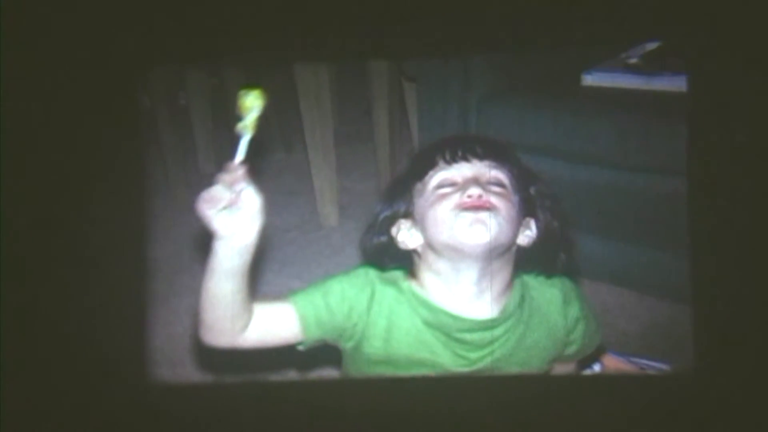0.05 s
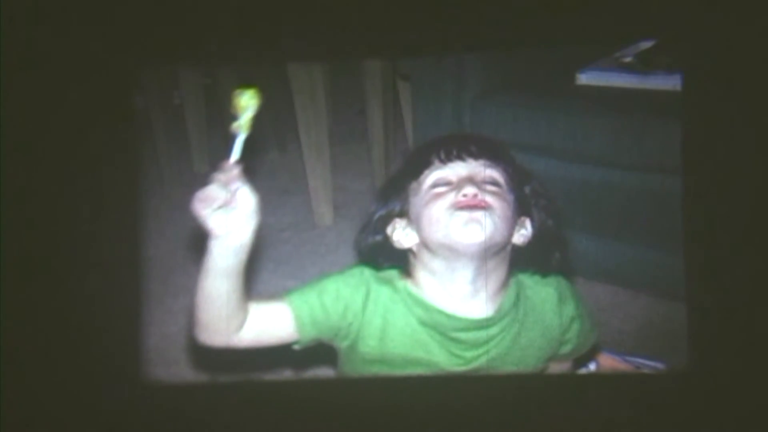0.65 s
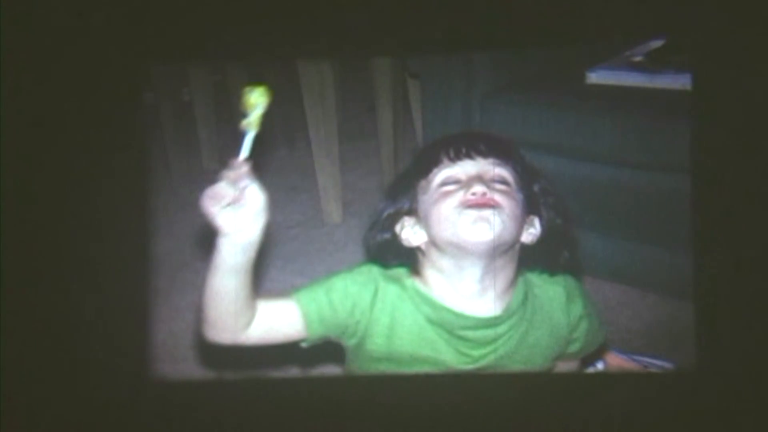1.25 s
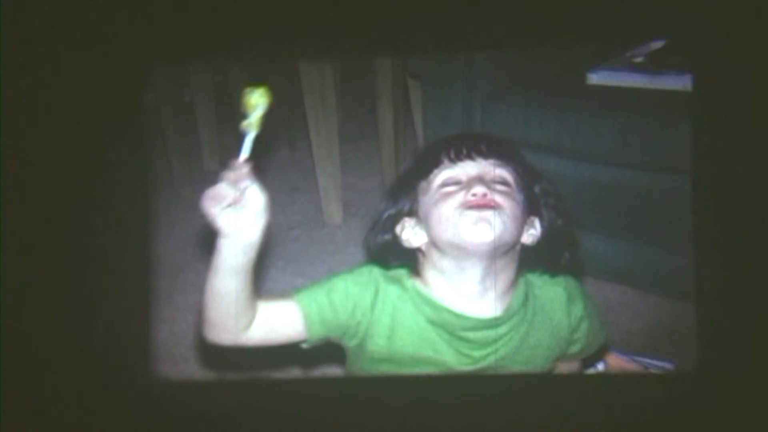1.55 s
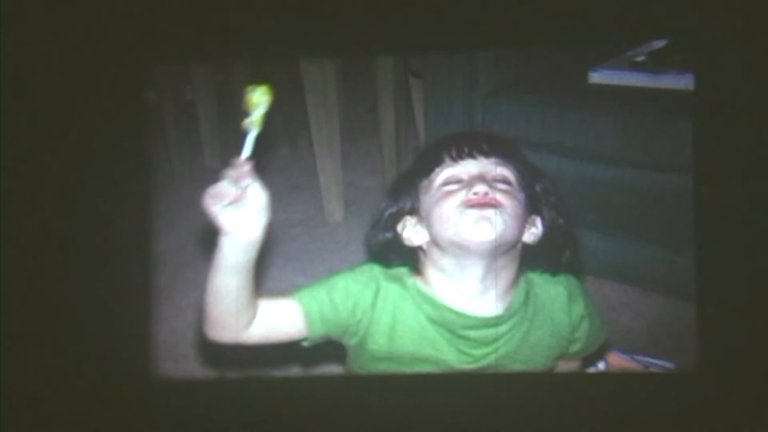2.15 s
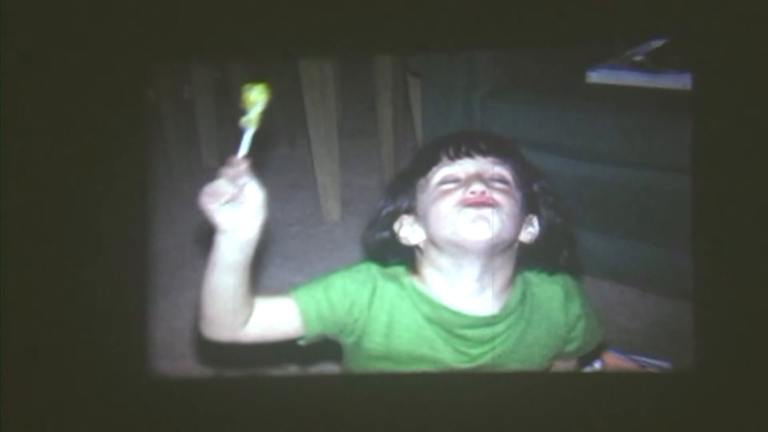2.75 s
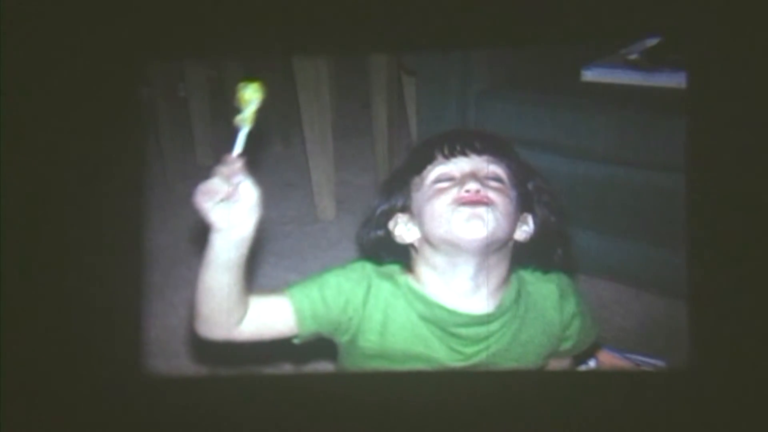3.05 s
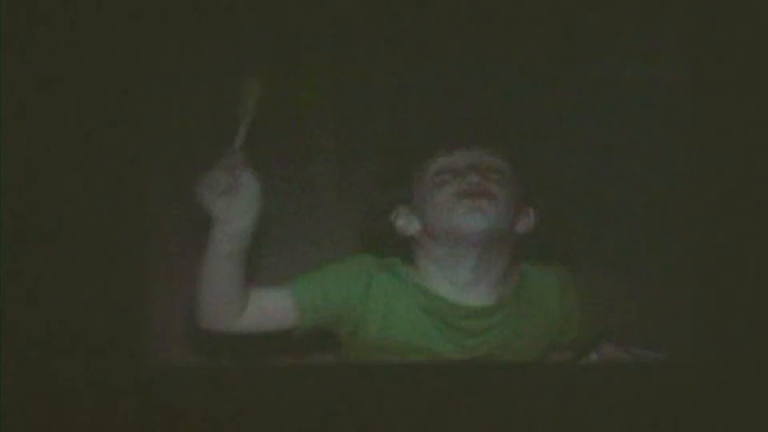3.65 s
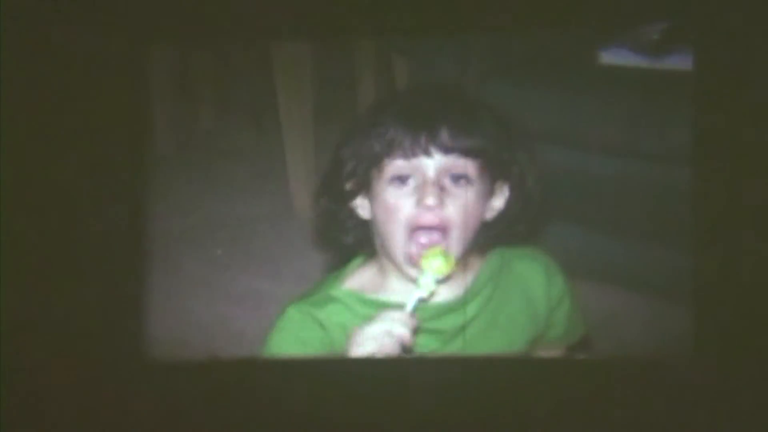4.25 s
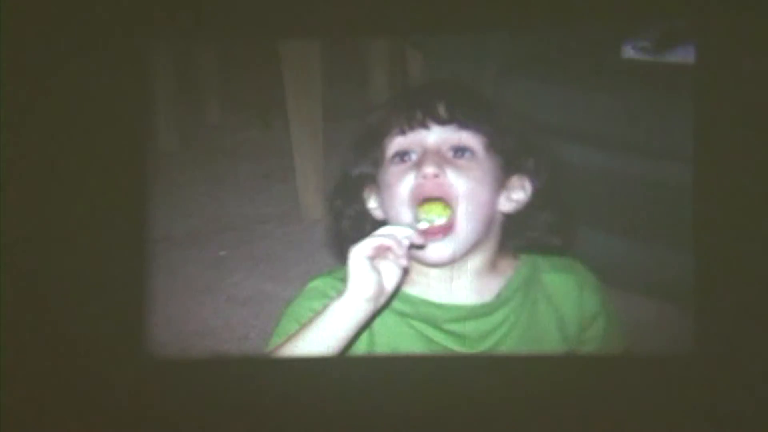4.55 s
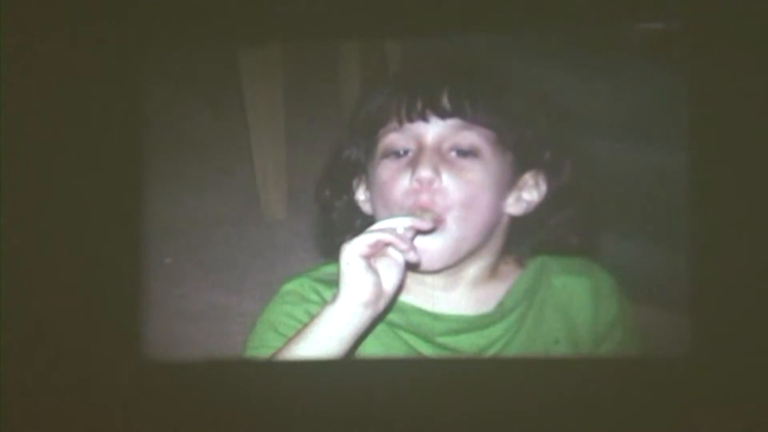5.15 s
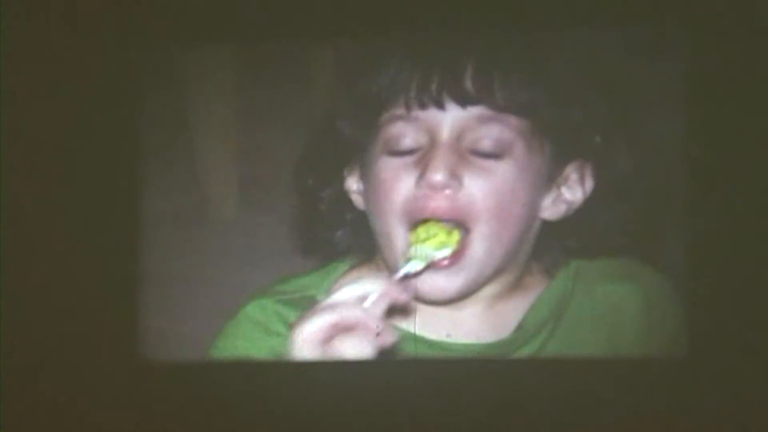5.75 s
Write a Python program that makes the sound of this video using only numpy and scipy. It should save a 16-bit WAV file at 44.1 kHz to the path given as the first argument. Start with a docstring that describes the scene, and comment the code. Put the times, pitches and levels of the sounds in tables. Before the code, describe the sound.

A quiet fan hum comes from a home film projector, near and a little to the left indoors. A few small knocks on its knob and a brief faint whirr precede a sharp, ringing switch clunk. The drive speeds up with several jolts and snaps, then settles into a fast, even clatter, with gears whirring, the motor droning and film hissing softly through the gate.

```python
"""A home film projector in a small room, close to the microphone and a little to the left.
It idles on a still frame: the fan hums, fingers nudge the control knob, a faint whirr comes and goes.
At 3.6 s the knob clunks over; the drive jolts and the film catches as the transport runs up.
Then, at about twenty frames a second, claw and shutter cam rattle the case once a frame,
over whirring gears, the motor's drone and the hiss of film in the gate."""
import sys
import numpy as np
from scipy import signal
from scipy.fft import rfft, irfft, next_fast_len
from scipy.io import wavfile
from scipy.ndimage import map_coordinates

SR = 44100
rng = np.random.default_rng(int(sys.argv[2]) if len(sys.argv) > 2 else 0)


def dump_mix(stems):
    """Bounce the given channels to the path in sys.argv[1] as a 16-bit WAV at rate SR."""
    frames = np.atleast_2d(stems).T  # one column per channel
    limited = np.clip(frames, -1, 1)  # hard clip at full scale
    pcm = np.round(limited * 32767).astype(np.int16)
    wavfile.write(sys.argv[1], SR, pcm)


N = 255420

# spectrum of the fan's draught: f/Hz, level/dB
DRAUGHT = [(18, -20), (35, -34), (55, -8), (75, -43), (100, -6.5), (160, -26.5), (205, -3.5), (330, -12.5),
           (420, -12.5), (600, -20.5), (950, -21), (1600, -29), (3900, -35.5), (4900, -41.5), (11000, -47),
           (14000, -57)]
# resonances of the case panels: f/Hz, width/Hz, level/dB
PANEL_MODES = [(348, 66, 4), (510, 21, 1), (964, 230, 5.5), (1016, 30, -14), (1304, 24, 8.5),
               (1320, 41, -12), (1610, 60, -4), (1700, 93, -0.5)]


def amp(db):
    return 10 ** (np.asarray(db) / 20)


def unit(x):
    return x / np.sqrt(np.mean(x ** 2) + 1e-20)


def running(x):
    """x scaled to rms 1 over the last second, at full speed."""
    return x / np.sqrt(np.mean(x[-SR:] ** 2) + 1e-20)


def clock(size=N):
    return np.arange(size) / SR


def bell(x, centre, width):
    return np.exp(-((x - centre) / width) ** 2)


def tone(cycles, shift_rad=0):
    """A sine that follows a count of cycles from a random phase."""
    return np.sin(2 * np.pi * (cycles + rng.random()) + shift_rad)


def wobble(rate):
    """A smooth random curve, rate knots a second."""
    return map_coordinates(rng.standard_normal(int(N * rate / SR) + 4), [np.arange(N) * rate / SR])


def along(points, hz):
    """(f/Hz, value) points joined on a log frequency axis."""
    f, v = np.transpose(points)
    return np.interp(np.log(hz + 1), np.log(f + 1), v)


def slope(points):
    """The response of a (f/Hz, level/dB) spectrum."""
    return lambda hz: amp(along(points, hz))


def resonances(modes):
    """The response of steep-skirted (f/Hz, width/Hz, level/dB) resonances."""
    return lambda f: np.sqrt(sum((amp(db) / (1 + ((hz * hz - f * f) / (2 * width * f + 1e-9)) ** 2)) ** 2
                                 for hz, width, db in modes))


def filtered(x, response):
    """x through a complex frequency response."""
    size = next_fast_len(len(x) + 8192)
    return irfft(rfft(x, size) * response(np.fft.rfftfreq(size, 1 / SR)), size)[:len(x)]


def noise(response, size=N):
    """Noise of rms 1 with exactly this colour."""
    gain = response(np.fft.rfftfreq(size, 1 / SR))
    return unit(irfft(gain * np.exp(2j * np.pi * rng.random(len(gain))), size))


def burst(response, t60, attack_s=0.00054):
    """A blow's dense ringing, dying away; its spectrum is drawn towards the body's own."""
    t = clock(8192)
    fade = amp(-60 * t / t60) * (1 - np.exp(-t / attack_s))
    phase = np.angle(rfft(noise(response, len(t)) * fade))
    ring = unit(irfft(np.exp(1j * phase) * response(np.fft.rfftfreq(len(t), 1 / SR))))
    return unit(ring * np.sqrt(fade)) * np.sqrt(np.mean(fade ** 2))


def add(track, s, sound):
    """Mix a sound in at time s."""
    part = track[round(s * SR):][:len(sound)]
    part += sound[:len(part)]


def enclosed(x, wet_db, t60):
    """Reflections in the housing and the room comb the spectrum with fine, fixed peaks."""
    tail = burst(slope([(250, -56), (800, -1), (20000, -3)]), t60)
    out = x + amp(wet_db) * signal.fftconvolve(x, tail / np.linalg.norm(tail))[:N]
    return out * np.std(x) / np.std(out)


def fan(fan_hz=26.24):
    """A steady hum near 100 Hz with overtones beats against the fan's tones, over the vents' draught."""
    # steady hum: f/Hz, level/dB
    hum_tones = [(100, -0.5), (199.5, -4.5), (400.5, -13.5), (502.5, -16)]
    # blade tones: multiple of the fan rate, level/dB
    blade_tones = [(2, -21), (4, 0.5), (5, 2.5), (6, -1.5), (7, -7), (8, 8), (9, 2.5), (10, -7)]
    # vent resonances: f/Hz, width/Hz, level/dB
    vents = [(220, 55, 2), (408, 31, -2.5), (1230, 200, -26), (2110, 54, -22), (3280, 23, -21),
             (3490, 33, -21.5), (3790, 100, -23), (6440, 420, -32)]
    t = clock()
    dip_db, dip_below_hz = -10.5 * bell(t, 1.72, 0.4), 150  # the lowest tones dip briefly
    turns = fan_hz * t + 0.026 * wobble(1.906)
    hum = sum(amp(db + wobble(2.5) + dip_db * (hz < dip_below_hz)) * tone(hz * t, 0.19 * wobble(4.97))
              for hz, db in hum_tones)
    blades = sum(amp(db + dip_db * (k * fan_hz < dip_below_hz)) * tone(k * turns) for k, db in blade_tones)
    draught = amp(-50.5) * noise(slope(DRAUGHT)) + amp(-52) * noise(resonances(vents))
    return amp(-48) * unit(hum) + amp(-47) * unit(blades) + enclosed(draught, wet_db=-7.5, t60=0.35)


def knob():
    """Fingers tap the knob in its play: light knocks, each with a tick."""
    # touches: t/s, level/dB, relative tick level/dB
    touches = [(0.6644, -28.5, -21.5), (0.702, -38.5, -24), (1.016, -45, -22), (1.214, -42, -20),
               (1.375, -54, -22), (2.182, -39.5, -28), (2.231, -42.5, -24)]
    # knob resonances: f/Hz, width/Hz, level/dB
    knob_modes = [(412, 48, -3.5), (512, 34, 1.5), (810, 144, -1.5), (940, 16, 5), (2040, 180, -20.5)]
    out = np.zeros(N)
    for s, db, tick_db in touches:
        tick = burst(slope([(800, -19), (1800, -7), (5800, -12), (8000, -26), (14000, -33)]), t60=0.056)
        knock = burst(resonances(knob_modes), t60=0.13)
        add(out, s, amp(db) * (knock + amp(tick_db) * tick))
    return out


def whirr():
    """A faint whirr swells and fades once, its thin whine rising and falling with it."""
    swell = bell(clock(), 2.765, 0.12)
    whine_hz = 9500 + 3050 * swell + 90 * wobble(400)
    whine = np.sin(2 * np.pi * np.cumsum(whine_hz) / SR)
    body = noise(resonances([(1250, 40, 0.5), (930, 180, -6)]))
    return amp(-53) * swell * (body + amp(-30) * whine)


def switch():
    """The switch cracks over and bounces; its lever sets the case ringing."""
    # blows: t/s, level/dB, relative crack level/dB, t60/s
    blows = [(3.614, -33, -1, 0.09), (3.62, -19, 3, 0.046), (3.6236, -10, -10, 0.12),
             (3.649, -17.5, -14, 0.24), (3.705, -29.5, -26, 0.085)]
    # ringing of the case: f/Hz, level/dB, t60/s
    case_modes = [(353.4, -0.5, 0.18), (443, -11, 0.29), (540, -5.5, 0.14), (693, -1.5, 0.089),
                  (891.6, 1, 0.14), (1066, -14, 0.18), (1277, -11.5, 0.16)]
    # lever resonances: f/Hz, width/Hz, level/dB
    lever_modes = [(127, 18, -15), (208, 71, 0), (344, 38, 1), (510, 100, 1.5), (660, 42, 0), (900, 190, 1),
                   (1060, 120, 0), (1380, 110, -6), (2000, 650, -27)]
    # spectrum of the crack: f/Hz, level/dB
    crack_colour = [(880, -45), (1500, 0), (1950, -10.5), (2850, -8), (3070, -17), (3740, -16), (9170, -30),
                    (14300, -45)]
    out, t = np.zeros(N), clock(8192)
    attack = 1 - np.exp(-t / 0.00076)
    for s, db, crack_db, t60 in blows:
        ring = attack * sum(amp(level - 60 * t / life) * tone(hz * t) for hz, level, life in case_modes)
        clunk = burst(resonances(lever_modes), t60)
        crack = burst(slope(crack_colour), 0.92 * t60)
        add(out, s, amp(db) * (amp(-1) * ring + amp(-0.5) * clunk + amp(crack_db) * crack))
    return out


def drone(t):
    """The drive hums under load, over a low rumble."""
    # hum tones: f/Hz, rms level/dB
    load_tones = [(99, -62), (102.6, -59.5), (120.1, -45)]
    hum = sum(amp(db) * np.sqrt(2) * tone(hz * t) for hz, db in load_tones)
    return hum + amp(-68) * noise(slope([(20, -18), (40, -16), (65, 9), (160, 23), (300, -45)]))


def cam(turns):
    """The same rough pattern on every turn; three shutter blades stress every third harmonic."""
    order = np.arange(1025)
    strength = amp(5.5 * (order % 3 == 0)) * (order > 0) * (order < 110)
    pattern = irfft(strength * np.exp(2j * np.pi * rng.random(len(order))))
    return np.interp(turns % 1, np.arange(len(pattern)) / len(pattern), pattern)


def gears(turns, since_claw, pace):
    """The cam's harmonics glide through the chassis resonances; grinding swells at each pull-down."""
    # sharp chassis resonances: f/Hz, width/Hz, level/dB
    chassis = [(121, 6.4, -22), (284, 33, -11.5), (310.9, 3.37, -4), (357.3, 12, -7.5), (425.9, 11, -0.5),
               (513.3, 6.2, 0), (549, 32, -12.5), (664, 14.3, -8), (740, 52, -29), (869, 31, -5.5),
               (921.3, 11.3, -5.5), (1027, 40, -21), (1120, 34, -14.5), (1420, 30, -15.5)]
    # spectrum of the grinding case: f/Hz, level/dB
    case_colour = [(110, -45), (170, -51), (240, -1.5), (330, 3.5), (560, 7), (720, -5), (900, -2),
                   (1120, 5), (1200, -51), (1400, -14), (1800, -6.5), (2600, -11), (3400, -49)]
    backlash = 0.0049 * wobble(18)
    song = running(filtered(cam(turns + backlash), resonances(chassis)))
    # the drive is loaded as it pulls the film down and runs free just before
    load = amp(4.2 * bell(since_claw, 0.012, 0.0067) - 2.3 * bell(since_claw, -0.016, 0.0031))
    grind = amp(-11) * running(load * noise(slope(case_colour)))
    grind += amp(-11.5) * running(load * noise(resonances(PANEL_MODES)))
    return amp(-3 + 2 * wobble(14)) * song * pace ** 1.32 + enclosed(grind, wet_db=-1.5, t60=0.14)


def film(claw_times):
    """The film slides through the gate while the claw ticks crisply in its perforations."""
    # spectrum of film in the gate: f/Hz, level/dB
    film_colour = [(1200, -34), (2100, -8), (2650, -0.5), (3050, -6.5), (4200, -10), (5000, -11),
                   (6600, -15.5), (9000, -20), (11000, -26.5), (14300, -36)]
    # the claw entering and leaving: delay/s, level/dB, t60/s
    claw = [(-.0005, 3.5, 0.041), (0.0135, -6, 0.079)]
    hiss = slope(film_colour)
    crisp = slope([(2000, -5.5), (5000, -1.5), (8000, 1.5), (14000, 4)])
    soft = slope([(2500, -2), (4200, 2), (9000, -3)])
    ticks = np.zeros(N)
    for s in claw_times:
        for delay, db, t60 in claw:
            add(ticks, s + delay, amp(db + rng.normal(0, 1.07)) * burst(lambda f: hiss(f) * crisp(f), t60))
    sliding = noise(lambda f: hiss(f) * soft(f))
    return enclosed(amp(-2) * running(ticks) + amp(1.5) * sliding, wet_db=-3.5, t60=0.075)


def rattle(claw_times, pace, jitter_s=0.00008, scatter_db=0.63):
    """Each contact of the cam rings the case alike frame after frame, most of them harder with speed."""
    # contacts: delay after the claw/s, f/Hz, width/Hz, level/dB, t60/s, power of speed (sign ignored)
    contacts = [(-.005, 887, 91, -9.5, 0.041, 1), (-.0005, 2500, 258, -23.5, 0.015, 31),
                (.002, 510, 107, -13.5, 0.043, 0), (.004, 890, 280, -17, 0.062, -1.5),
                (.012, 1582, 63.7, -16.5, 0.046, 3), (.012, 610, 233, -11.5, 0.056, 1),
                (.013, 900, 201, -13.5, .065, -1), (.003, 2010, 260, -25, 0.033, 2.5),
                (0.0098, 2850, 670, -31, 0.066, 3)]
    out = np.zeros(N)
    for delay, hz, width, db, t60, power in contacts:
        ring = burst(resonances([(hz, width, 0)]), t60)
        late, weak = rng.standard_normal((len(claw_times), 2)).T
        at = np.round((claw_times + delay + jitter_s * late) * SR).astype(int)
        blows = np.bincount(at, amp(-scatter_db * weak), N)[:N] * pace ** abs(power)
        out += amp(db) * running(signal.fftconvolve(blows, ring)[:N])
    return out


def run_up(frame_hz, teeth_per_frame=129):
    """The drive jolts, perforations catch on the metal gate and a gear sings through a resonance."""
    # the drive takes up its slack: t/s, level/dB
    jolts = [(3.766, -25.5), (3.827, -27), (3.869, -20), (3.929, -21), (3.967, -31)]
    # the film catches: t/s, level/dB, relative ring level/dB
    snags = [(4.0366, -30.5, -9), (4.411, -24, -3), (4.4617, -19.5, -13), (4.6123, -30, -21)]
    # gate resonances: f/Hz, width/Hz, level/dB
    gate_modes = [(2400, 56, 4), (4100, 88, 7.5), (5540, 50, -1), (6350, 50, -7), (6530, 60, 0)]
    mesh_hz = teeth_per_frame * frame_hz
    mesh = np.sin(2 * np.pi * np.cumsum(mesh_hz + 8 * wobble(150)) / SR)
    out = mesh * resonances([(2514, 40, -35)])(mesh_hz)
    for s, db in jolts:
        add(out, s, amp(db) * burst(resonances(PANEL_MODES), t60=0.043))
    for s, db, ring_db in snags:
        snap = burst(slope([(1000, 6), (1800, 21), (4200, -4), (7000, -1), (14000, -21)]), t60=0.1)
        add(out, s, amp(db) * (snap + amp(ring_db) * burst(resonances(gate_modes), t60=0.1)))
    return out


def motor(turns, pace, belt_ratio=3.078):
    """Near full speed the motor sings at multiples of its shaft rate; its belt slips slightly."""
    # motor tones: multiple of the shaft rate, level/dB
    harmonics = [(1, -37), (3, -15), (6, -27), (14, -17), (15, -11), (17, -10.5), (20, -21), (22, -22.5),
                 (25, -17), (28, -30), (31, -26)]
    shaft = belt_ratio * turns + 0.01 * wobble(9)
    song = sum(amp(db + 0.43 * wobble(4.7)) * np.sqrt(2) * tone(k * shaft) for k, db in harmonics)
    return amp(-2) * song * pace ** 22


def transport(start_s=3.62, spin_up_s=0.24, clutch_s=3.63, full_frame_hz=20.53):
    """The drive shaft eases up to speed, one turn a frame, timing the works as they grow louder."""
    t = clock()
    pace = 1 - np.exp(-np.maximum(t - start_s, 0) / spin_up_s)  # share of full speed
    frame_hz = full_frame_hz * pace
    turns = np.cumsum(frame_hz) / SR
    turns -= turns[round(5.2971 * SR)]  # one claw stroke falls at this time
    claw_times = t[1:][np.diff(np.floor(turns)) > 0]
    since_claw = ((turns + 0.5) % 1 - 0.5) / np.maximum(frame_hz, 1)  # s from the nearest stroke
    works_db = -17.5 - 13 * np.maximum(1 - pace / 0.79, 0)
    works_db -= 14 * (1 - pace) * bell(since_claw, -0.02, 0.004)  # a slow drive slackens before a stroke
    film_db = -42.5 - 17 * (1 - pace)
    works = rattle(claw_times, pace) + gears(turns, since_claw, pace) + motor(turns, pace)
    engaged = np.clip((t - clutch_s) / 0.011, 0, 1)
    out = engaged * (amp(works_db) * works + drone(t) + amp(film_db) * film(claw_times))
    radiation = slope([(25, -22), (45, -12), (70, 1), (200, 0)])  # the small case gives little deep bass
    return filtered(out + run_up(frame_hz), radiation)


def leaning(x, pan, lead_rad_per_db=0.1168):
    """The side signal of a source that is louder on the left, and earlier there in proportion."""
    def response(hz):
        left_db = along(pan, hz)
        return np.tanh((np.log(amp(left_db)) + 1j * lead_rad_per_db * left_db) / 2)
    return filtered(x, response)


def scene():
    """The projector stands near, a little left, with side echo and draught; above 3 kHz it is centred."""
    # left-right balance of the mechanism: f/Hz, left minus right/dB
    machine_pan = [(60, -.5), (120, .3), (250, 1.1), (550, 3.3), (1100, 3), (2300, 4.3), (3100, 1.8),
                   (3600, 0), (14000, 0)]
    # left-right balance of the fan: f/Hz, left minus right/dB
    fan_pan = [(60, .8), (115, .2), (200, 2.3), (400, 1.6), (1200, 1), (2500, 0)]
    # side echo: f/Hz, level/dB
    echo_colour = [(30, -6), (100, -19), (500, -20.5), (1100, -19), (2200, -11.5), (3200, -31), (4500, -55)]
    # side draught: f/Hz, level/dB
    side_colour = [(40, -2), (110, -15), (220, -15), (400, -10), (600, -3), (1000, -4), (2200, -2),
                   (2950, -4.5), (3400, -44), (14000, -30)]
    air, machine = fan(), whirr() + knob() + switch() + transport()
    tail = burst(slope([(20, 0.019), (20000, 0)]), t60=0.72)
    side_echo = filtered(signal.fftconvolve(machine, tail / np.linalg.norm(tail))[:N], slope(echo_colour))
    side_draught = amp(-50) * filtered(noise(slope(DRAUGHT)), slope(side_colour))
    mid = air + machine
    side = leaning(air, fan_pan) + leaning(machine, machine_pan) + side_echo + side_draught
    return np.array([mid + side, mid - side])


def record(dry, ceiling=0.92, top_hz=14400):
    """The loudest peaks are softly rounded and the top treble is cut."""
    rounded = dry / (1 + (dry / ceiling) ** 8) ** (1 / 8)
    return np.array([filtered(channel, lambda hz: hz < top_hz) for channel in rounded])


dry = scene()
out = record(dry)
dump_mix(out)
```